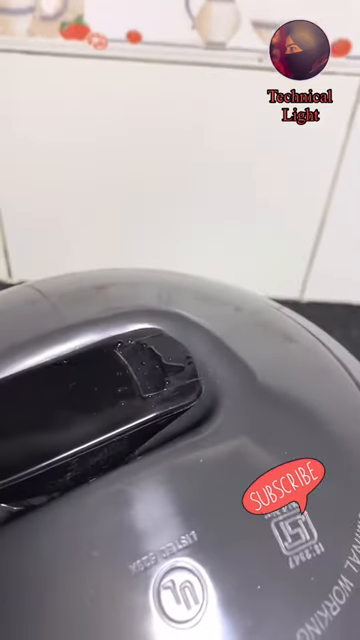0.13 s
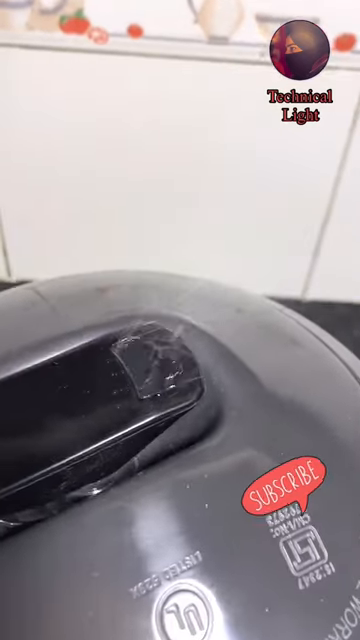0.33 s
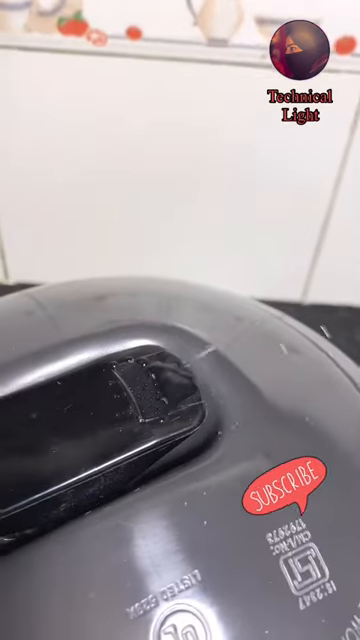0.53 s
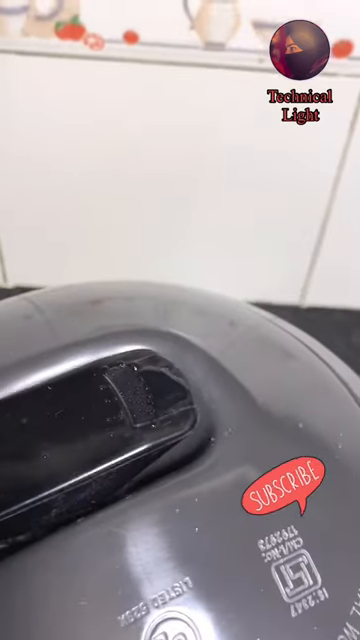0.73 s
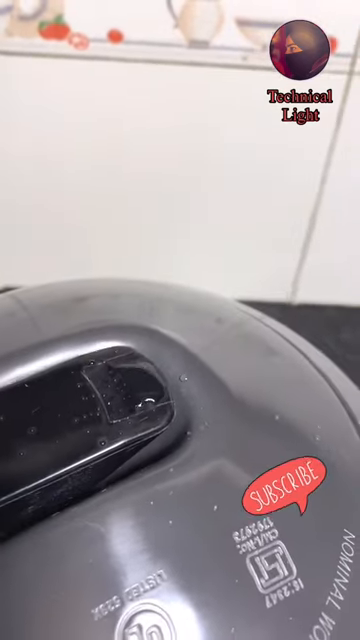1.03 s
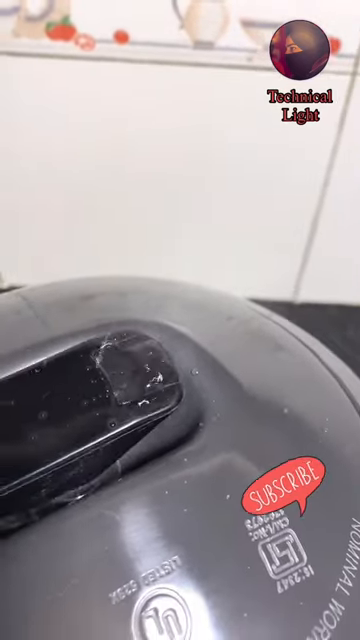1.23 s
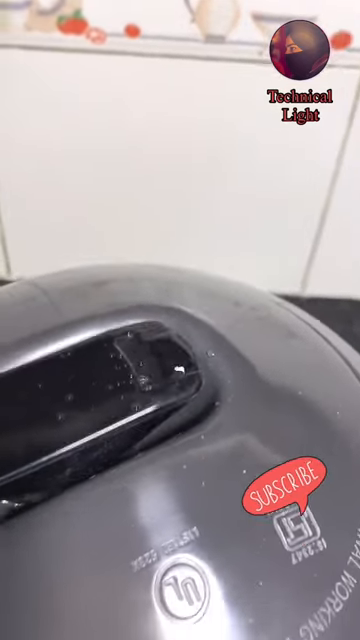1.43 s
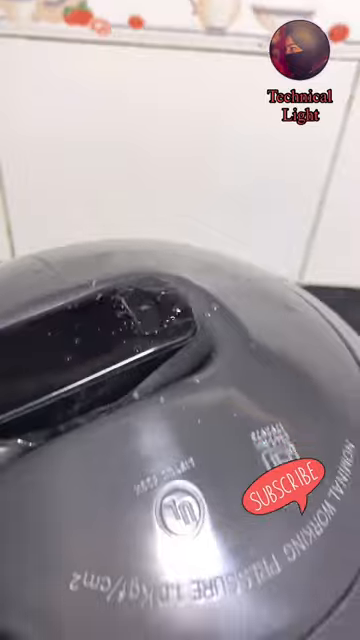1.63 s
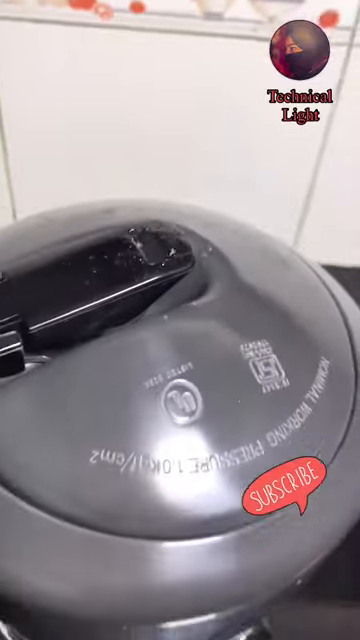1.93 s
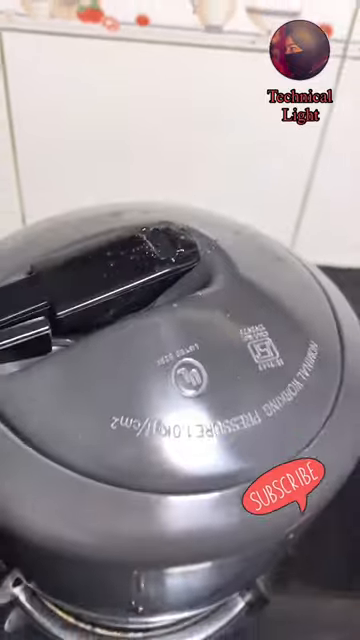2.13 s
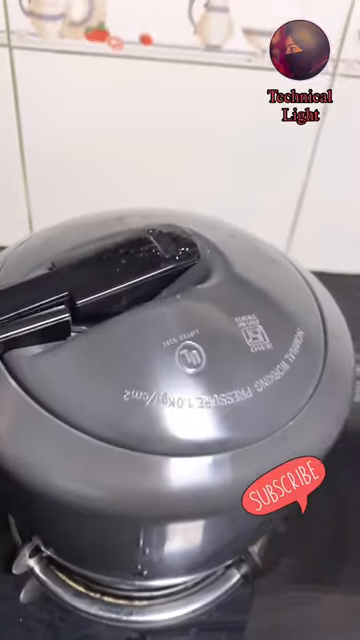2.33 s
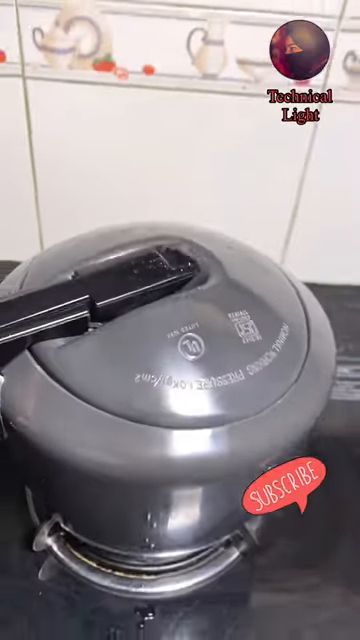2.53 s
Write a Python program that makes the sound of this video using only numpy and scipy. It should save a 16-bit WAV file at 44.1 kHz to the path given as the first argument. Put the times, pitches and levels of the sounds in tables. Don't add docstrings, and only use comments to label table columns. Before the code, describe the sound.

A pressure cooker lets out four bright steam blasts, the first loudest and wet with sputter, then two short bursts and a long fading hiss; valve knocks between them, close stereo microphone in a small tiled kitchen.

```python
import sys
import numpy as np
from scipy import signal
from scipy.fft import rfft, irfft
from scipy.io import wavfile

SR = 44100
rng = np.random.default_rng(int(sys.argv[2]) if len(sys.argv) > 2 else 0)


def how_loud(loudness_db):
    steps = np.asarray(loudness_db, float) / 20
    return 10 ** steps


def to_wav(s):
    ch = np.atleast_2d(s).T
    pcm = np.round(np.clip(ch, -1, 1) * 32767)
    wavfile.write(sys.argv[1], SR, pcm.astype(np.int16))


N = 119070


def rms_one(x):
    return x / np.sqrt(np.mean(x ** 2) + 1e-20)


def in_time(rows):
    return np.interp(np.arange(N) / SR, *np.transpose(rows))


def at_hz(points, hz):
    points = np.array(points)
    return np.interp(np.log(hz + 1), np.log(points[:, 0]), points[:, 1])


def colour(x, db_of):
    hz = np.arange(N // 2 + 1) * SR / N
    return irfft(rfft(x) * how_loud(db_of(hz)), N)


def drift(rate_hz):
    r = np.exp(-20 * np.pi * rate_hz / SR)
    noise = rng.standard_normal(N // 10 + 4002)
    slow = signal.lfilter([1], [1, -2 * r, r * r], noise)[4000:]
    return np.interp(np.arange(N) / 10, np.arange(len(slow)), rms_one(slow - slow.mean()))


def ring(clicks, hz, t60_s):
    r = how_loud(-60 / (t60_s * SR))
    w = 2 * np.pi * hz / SR
    return signal.lfilter([0, np.sin(w)], [1, -2 * r * np.cos(w), r * r], clicks + 1e-18)


def swells(rows):
    t = np.arange(N) / SR
    out = np.zeros(N)
    for s, db, length in rows:
        away = np.where(t < s, 2 * (s - t), t - s)
        out += how_loud(db) * np.exp(-away ** 2 / max(length, .001) ** 2)
    return out


def lose_top(x):
    return colour(x, lambda hz: -11.5 * np.clip((hz - 14300) / 500, 0, 1))


def noise_floor():
    # (frequency [Hz], level [dB per Hz])
    floor_eq = [(40, -15.5), (110, -8), (250, -29.5), (1100, -31.5), (1550, -19), (2200, -35.5),
                (6000, -36.5), (15800, -27.5)]
    # (time [s], level [dB])
    floor_fade = [(0, 1.5), (.15, 0), (2.3, -5), (2.7, -13)]
    noise = colour(rng.standard_normal((3, N)), lambda hz: at_hz(floor_eq, hz))
    return lose_top(how_loud(-64 + in_time(floor_fade)) * rms_one(noise))


def flow():
    # (time [s], level [dB])
    blasts = [
        [(0.168, -74), (0.178, -44.5), (0.194, -31), (0.22, -12.5), (0.338, -23), (0.418, -20.5), (0.558, -39),
         (0.572, -43.5)],
        [(0.736, -65.5), (0.756, -36.5), (0.774, -22), (0.79, -15), (0.922, -23), (0.946, -31), (0.975, -52)],
        [(1.11, -97), (1.138, -35.5), (1.176, -14), (1.19, -18.5), (1.314, -24.5), (1.354, -38.5), (1.362, -52)],
        [(1.44, -89), (1.46, -37), (1.49, -21.5), (1.726, -26), (1.984, -26.5), (2.424, -31.5), (2.446, -31),
         (2.468, -43.5)],
    ]
    shut_db, open_s, shut_s = -85.5, .01, .03
    rows = []
    for blast in blasts:
        rows += [(blast[0][0] - open_s, shut_db), *blast, (blast[-1][0] + shut_s, shut_db)]
    return how_loud(in_time(rows))


def jet(gain):
    # (frequency [Hz], level [dB per Hz])
    jet_eq = [(150, -35.5), (860, -28), (1500, -18.5), (3500, -11.5), (6000, -9.5), (9000, -3), (13000, -3),
              (15800, -4.5)]
    # (frequency [Hz], width [Hz], boost [dB])
    nozzle = [(2220, 670, 6.5), (2780, 300, -3.5), (4530, 1200, 1.5), (7430, 4200, 8.5), (12420, 2000, 6.5)]
    jet_db, flutter_db, patch_db, low_patch = 3, 1.05, 0.5, 4
    dull_when_hard = 0.084

    def shape(hz):
        peaks = sum(db / (1 + (2 * (hz - top) / width) ** 2) for top, width, db in nozzle)
        return at_hz(jet_eq, hz) + peaks

    hiss = rms_one(colour(rng.standard_normal((3, N)), shape))
    together = drift(40) + drift(250)
    out = 0
    for centre in 300 * 2 ** np.arange(0, 6.):
        def octave(hz):
            away = np.abs(np.log2(np.clip(hz, 300, 9600) / centre))
            return 20 * np.log10(np.clip(1 - away, 1e-5, 1))

        patchy = patch_db * (low_patch if centre < 3000 else 1) * drift(20)
        band = colour(hiss, octave) * how_loud(flutter_db * together + patchy)
        if centre > 9000:
            band = band * gain ** -dull_when_hard / 1.42
        out = out + band
    return gain * how_loud(jet_db) * out


def water_grains(per_s):
    # (frequency [Hz], level [dB per Hz])
    water_eq = [(200, -24), (700, -12.5), (1300, -8.5), (2100, 3), (3000, -9), (6000, -9.5), (12000, -26.5)]
    sizes = how_loud(3.5 * np.minimum(rng.exponential(1, N), 3)) * rng.choice([-1, 1], N)
    grains = sizes * (rng.random(N) < per_s / SR)
    return rms_one(colour(grains, lambda hz: at_hz(water_eq, hz)))


def droplets(gain):
    return how_loud(-22.5) * gain * water_grains(90)


def kitchen(x):
    low_t60_s, high_t60_s, split_hz = 0.64, 0.26, 3000
    t = np.arange(SR // 2) / SR
    noise = rng.standard_normal((3, len(t))) * np.minimum(t / .006, 1) ** 2
    low = signal.sosfilt(signal.butter(1, split_hz, fs=SR, output="sos"), noise)
    tail = low * how_loud(-60 * t / low_t60_s) + (noise - low) * how_loud(-60 * t / high_t60_s)
    return lose_top(signal.fftconvolve(x[None], tail / 10)[:, :N])


def slugs():
    # (time [s], level [dB], length [s])
    spits = [(.222, -34.5, 0.017), (.236, -29, 0.0061), (.253, -17, .012), (.273, -24, 0.0079),
             (.316, -28, 0.0084), (.412, -38.5, 0.0033), (.498, -41, .01), (.797, -25, 0.0064),
             (1.172, -33.5, 0.015), (1.498, -35, 0.011), (1.529, -35, .005), (1.79, -45, 0.0054),
             (1.815, -46.5, .006), (2.196, -39.5, 0.0043), (.912, -35, 0.014)]
    return swells(spits) * water_grains(6000)


def snaps():
    # (time [s], peak level [dB])
    big_drops = [(.228, -16), (0.244, -17), (0.782, -25), (1.492, -24.5), (1.501, -23.5), (1.786, -30),
                 (1.815, -28), (1.867, -26), (1.922, -28.5), (2.05, -30), (2.163, -26.5), (2.204, -25.5),
                 (2.338, -23.5)]
    s, db = np.transpose(big_drops)
    clicks = np.zeros(N)
    clicks[(s * SR).astype(int)] = how_loud(db)
    sos = signal.butter(2, 900, "high", fs=SR, output="sos")
    return signal.sosfilt(sos, ring(clicks, 2490, 0.0049))


def puffs():
    # (time [s], level [dB], length [s])
    gusts = [
        (.275, -49.5, .035),
        (.585, -65, 0.032),
        (.81, -61.5, .03),
        (1.185, -59, .03),
        (1.375, -62, .025),
        (1.53, -64.5, 0.044),
        (2.49, -67.5, 0.037),
    ]
    sos = signal.butter(2, [45, 176], "band", fs=SR, output="sos")
    return swells(gusts) * rms_one(signal.sosfilt(sos, rng.standard_normal(N)))


def valve():
    # (time [s], peak level [dB])
    hits = [
        (.5660, -24),
        (0.7976, -20),
        (.9665, -30.5),
        (1.175, -25.5),
        (1.351, -23),
        (1.5274, -30.5),
        (2.463, -28.5),
    ]
    # (frequency [Hz], level [dB], decay time t60 [s])
    lid = [(532, -27.5, 0.15), (627, -28.5, .04), (866, -14, 0.055), (1197, -23, 0.005), (1690, -5.5, 0.01),
           (2650, -11, .02), (2970, -4.5, 0.018)]
    s, db = np.transpose(hits)
    at = (s * SR).astype(int)
    strength_db = rng.normal(0, 2, (len(s), len(lid)))
    clicks = np.zeros(N)
    clicks[at] = how_loud(db + 1)
    out = ring(clicks, 1050, .004)
    for k, (hz, level_db, t60_s) in enumerate(lid):
        clicks[at] = how_loud(db + level_db + strength_db[:, k])
        soft = np.convolve(clicks, np.hanning(12) / 6)[:N]
        out = out + ring(soft, hz, t60_s)
    return signal.sosfilt(signal.butter(3, 430, "high", fs=SR, output="sos"), out)


def rubs():
    # (time [s], level [dB], length [s])
    strokes = [
        (.578, -48.5, 0.031),
        (.77, -48, .015),
        (.94, -46, 0.013),
        (.972, -45, .01),
        (1.337, -42, 0.011),
        (1.36, -43, 0.015),
        (2.449, -46, 0.011),
        (2.47, -51, 0.026),
    ]
    # (frequency [Hz], level [dB per Hz])
    hollow = [(250, -33.5), (430, -20), (510, 1), (620, -3.5), (850, -9), (1200, -19.5), (3000, -32.5)]
    noise = colour(rng.standard_normal(N), lambda hz: at_hz(hollow, hz))
    return swells(strokes) * rms_one(noise)


def port_phase(hz):
    in_step_hz, turn_hz, dwell = 1705, 5340, 0.76
    even = np.minimum(2 * np.pi * np.maximum(hz - in_step_hz, 0) / turn_hz, 5 * np.pi)
    return even - dwell * np.sin(2 * even) / 2


def heard_alone(hiss, still):
    # (frequency [Hz], level [dB])
    own_eq = [(60, -34), (300, -15.5), (700, -11.5), (1300, -22.5), (2800, -4.5), (5500, -3.5),
              (14000, -6.5)]

    def one_jet(hz):
        return -8.5 * np.exp(-(2 * (hz - 4420) / 330) ** 2)

    def apart(hz):
        notch = 20 * np.log10(np.abs(np.sin(port_phase(hz))) + 0.015)
        return at_hz(own_eq, hz) + np.where(hz > 6000, notch, 0)

    return colour(colour(hiss, one_jet) + still, apart)


def scene():
    floor = noise_floor()
    gain = flow()
    hiss = jet(gain)
    steam = hiss[0] + droplets(gain) + slugs() + snaps()
    metal = valve() + rubs()
    room = kitchen(how_loud(-29.5) * steam + how_loud(-23) * metal)
    still = how_loud(7.5) * (room + floor)
    panned = metal * how_loud([[-2], [2]])
    return steam + panned + room[0] + puffs() + floor[0] + heard_alone(hiss[1:], still[1:])


def roll_off(x):
    return signal.sosfilt(signal.butter(12, 15820, fs=SR, output="sos"), x)


def record(dry):
    # (frequency [Hz], left minus right [dB])
    ports = [(1500, 1), (2000, -1), (2600, -6), (3400, -2.5), (4200, 0)]
    hz = np.arange(N // 2 + 1) * SR / N
    half = np.exp(.5j * port_phase(hz)) * how_loud(at_hz(ports, hz) / 2)
    smear = np.exp(-2j * np.pi * 1.09 * (np.log(1 + hz / 30) - hz / 3000))
    x = irfft(rfft(dry) * smear * np.array([half, 1 / half]), N)

    def band_limits(f):
        return -60 * np.clip((f - 15900) / 200 + 1, 0, 1) ** 2 - 8 * np.clip(2 - f / 25, 0, 1)

    mix = colour(1.3 * np.tanh(x / 1.3), band_limits)
    return roll_off(mix)


dry = scene()
out = record(dry)
to_wav(out)
```